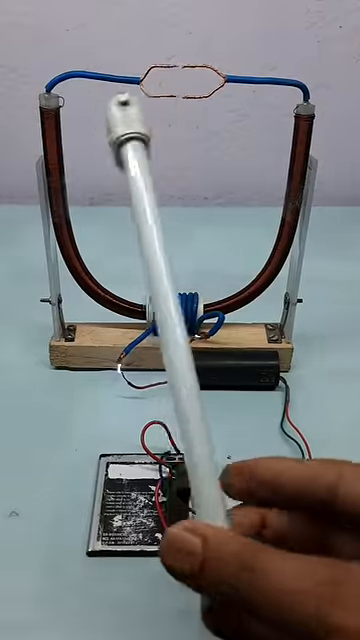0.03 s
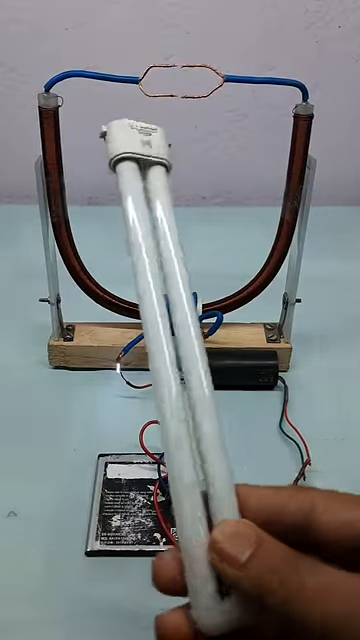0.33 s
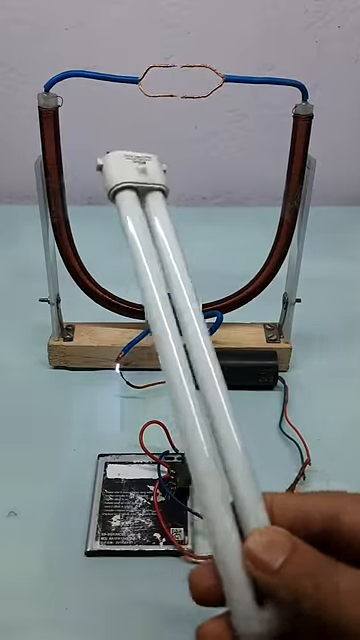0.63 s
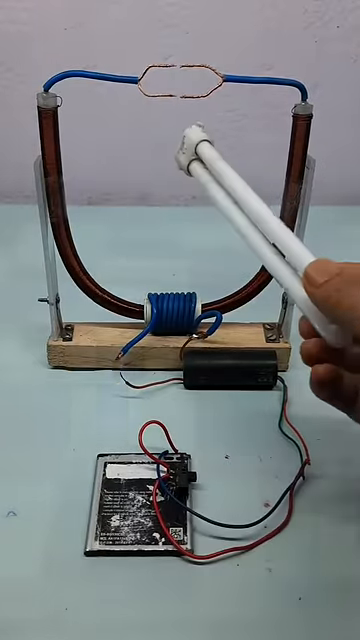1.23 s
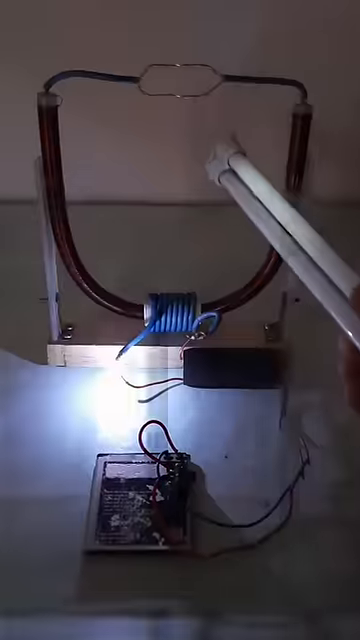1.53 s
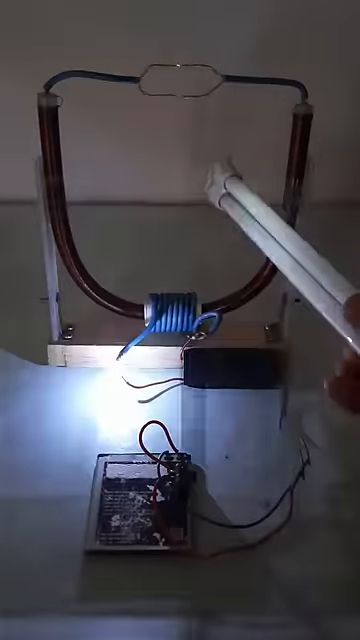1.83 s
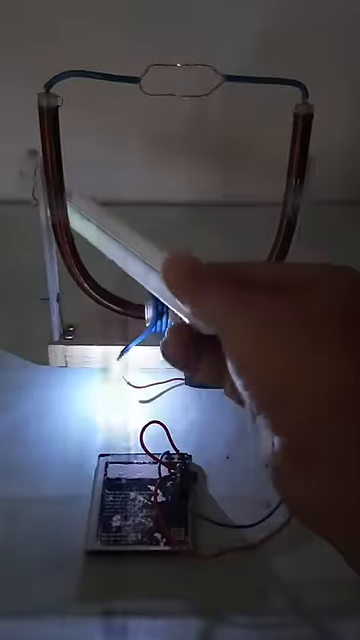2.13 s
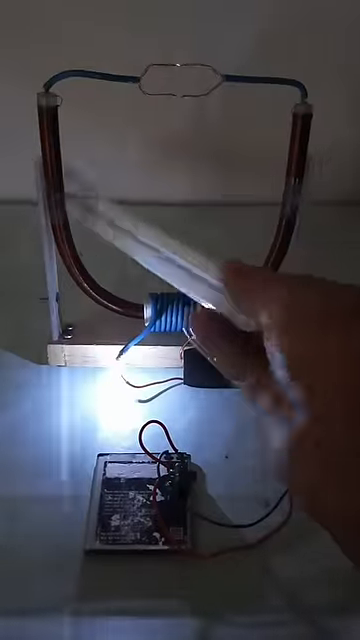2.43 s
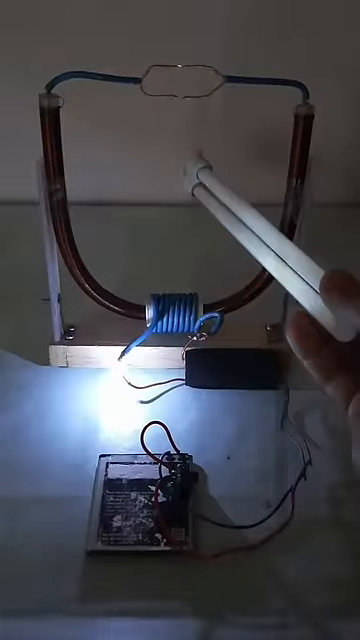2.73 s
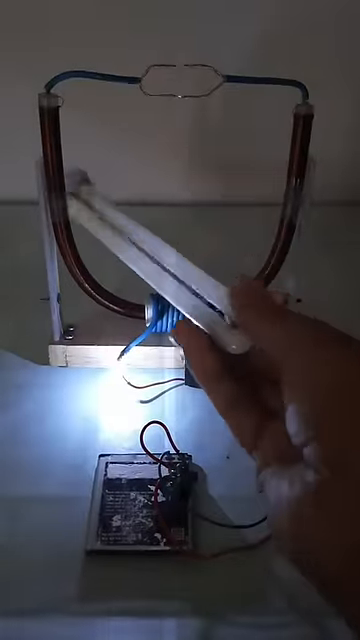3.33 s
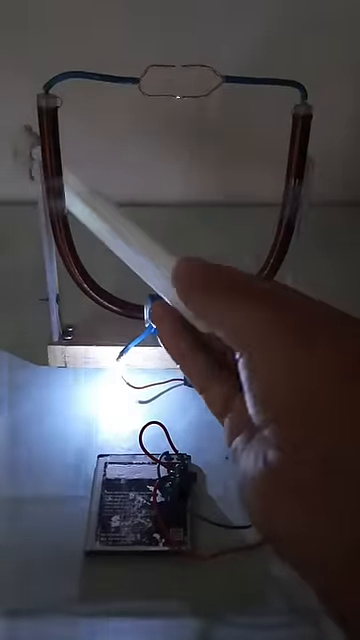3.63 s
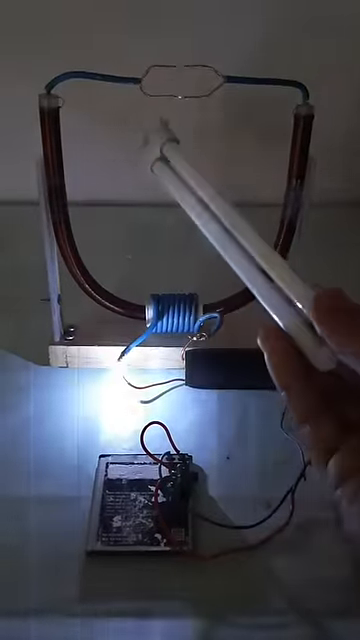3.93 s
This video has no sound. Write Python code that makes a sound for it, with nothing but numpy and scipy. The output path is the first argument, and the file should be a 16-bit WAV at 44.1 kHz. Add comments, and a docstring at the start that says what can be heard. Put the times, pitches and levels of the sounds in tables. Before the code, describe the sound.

An electric arc crackles and buzzes continuously on a tabletop coil device in a small room. The close, raspy sound wavers slightly in strength and tone, with small low pops under the sparks and a soft background hiss.

```python
"""On a table in a small room, a high-voltage module driving a homemade coil fires across a spark gap
about two hundred times a second. The air breaks down after a short or a long charge, so the buzz
sputters or settles on a pitch. Each spark is a sharp snap from a crooked channel, with a low pop of
heated air. The wandering arc changes strength and colour; the table reflects each snap, and
reverberation fills the gaps over a steady background hiss."""
import sys
import numpy as np
from scipy import signal
from scipy.fft import rfft, irfft
from scipy.io import wavfile
from scipy.ndimage import uniform_filter1d

SR = 44100
rng = np.random.default_rng(int(sys.argv[2]) if len(sys.argv) > 2 else 0)


def unload_wav(signal):
    """Save mono or channel-first audio to the path in sys.argv[1] as 16-bit WAV at rate SR, clipped to [-1, 1]."""
    wavfile.write(
        sys.argv[1],
        SR,
        np.round(np.clip(np.atleast_2d(signal).T, -1, 1) * 32767).astype(np.int16),
    )


N = 176400
TIME = np.arange(N) / SR
BIN_HZ = np.maximum(np.arange(N // 2 + 1) * SR / N, 1)
POP_HZ, RASP_HZ, CRACK_HZ, FIZZ_HZ = (13, 1366), (1366, 2890), (2860, 7060), (7060, SR / 2)  # band edges

# Spectrum of a spark. Each row: frequency in Hz, relative level in dB.
SPARK_SPECTRUM = [(40, -23), (85, -20), (140, -5), (280, 3.5), (430, 2), (720, 6.5), (950, 2.5), (1500, 1),
                  (2250, 2.5), (3000, 3), (3900, -2.5), (4800, 3.5), (5900, -2), (6900, -3.5), (9000, -6),
                  (12500, -3), (16000, -7)]


def undb(db):
    """Amplitude ratio: a factor of ten for every 20 dB."""
    return 10 ** (np.asarray(db) / 20)


def unit(x):
    """Normalisation to rms 1."""
    return x / np.sqrt(np.mean(x ** 2))


def even(x, window_s=.016):
    """Division by the running rms holds the power steady over a few sparks."""
    size = int(window_s * SR)
    power = uniform_filter1d(uniform_filter1d(np.mean(x ** 2, axis=0), size), size)
    return x / np.sqrt(power + 1e-4 * power.mean())


def curve(rows):
    """Amplitude envelope, interpolated between rows of time in seconds and level in dB."""
    return undb(np.interp(TIME, *np.array(rows).T))


def wander(per_s):
    """Interpolated Gaussian noise: a slow fluctuation with a spread near 1."""
    return 1.2 * np.interp(TIME * per_s, np.arange(2000), rng.standard_normal(2000))


def colour(x, points):
    """Minimum-phase filter through points of frequency in Hz and gain in dB."""
    hz, db = np.array(points).T
    gain = undb(np.interp(np.log(BIN_HZ), np.log(hz), db))
    cepstrum = irfft(np.log(gain), N)
    cepstrum[1:N // 2] *= 2  # folding onto positive time makes the filter causal
    cepstrum[N // 2 + 1:] = 0
    return irfft(rfft(x) * np.exp(rfft(cepstrum)), N)


def band(x, lo_hz, hi_hz):
    """Zero-phase band-pass filter with soft edges."""
    return irfft(rfft(x) / np.sqrt((1 + (lo_hz / BIN_HZ) ** 10) * (1 + (BIN_HZ / hi_hz) ** 10)), N)


def delay(x, seconds):
    """A delay is a phase lag proportional to frequency."""
    return irfft(rfft(x) * np.exp(-2j * np.pi * BIN_HZ * seconds), N)


def resonate(x, hz, width_hz):
    """Second-order resonator, whose Q is its frequency over its bandwidth."""
    return signal.lfilter(*signal.iirpeak(hz, hz / width_hz, fs=SR), x)


def multipath(x, envelope, changes_per_s, count):
    """Multipath propagation: x crossfades among random echo patterns, unrelated left and right."""
    shares = np.array([wander(changes_per_s) for _ in range(count)])
    shares /= np.sqrt(np.sum(shares ** 2, axis=0))
    patterns = rng.standard_normal((count, 2, len(envelope))) * envelope / np.sqrt(np.sum(envelope ** 2))
    return sum(signal.fftconvolve(np.atleast_2d(x * share), pattern, axes=1)[:, :N]
               for share, pattern in zip(shares, patterns))


def breakdowns(count=1100, repeat_chance=.25):
    """Relaxation oscillation: the gap fires after each short or long charge. Gives sample positions."""
    # Each row: time in seconds, chance of a long charge (at 1 the buzz has a pitch, near .5 it sputters).
    long_chances = [(0, .95), (.17, .95), (.2, .4), (.37, .4), (.4, 1), (.51, 1), (.55, .6), (.8, .7),
                    (.85, .45), (1.8, .6), (1.88, .2), (2.0, .55), (2.7, .5), (2.8, .2), (2.87, .8),
                    (3.14, .7), (3.19, .2), (3.25, 1), (3.46, 1), (3.5, .65)]
    short_s, short_jitter_s, long_s, long_jitter_s = .00405, .00012, .00545, .00032
    when, chance = np.array(long_chances).T
    drifts = 1 + .04 * wander(per_s=25)[::N // count][:count]
    now, is_long, positions = 0., True, []
    for (change, pick), jitter, drift in zip(rng.random((count, 2)), rng.standard_normal(count), drifts):
        if change > repeat_chance:
            is_long = pick < np.interp(now, when, chance)
        now += long_s * drift + long_jitter_s * jitter if is_long else short_s + short_jitter_s * jitter
        positions.append(int(now * SR))
    return np.array([i for i in positions if i < N])


def snaps(at, scatter_db):
    """Impulsive excitation: one impulse of log-normal size for each spark."""
    return np.bincount(at, minlength=N) * undb(scatter_db * rng.standard_normal(N))


def straight_channel(snap):
    """Path difference: the arc's straight part sends a clean snap that reaches one side later."""
    # Each row: time in seconds, lag on the left in seconds, level against the crooked part in dB.
    arc_places = [(0, .00029, -5), (.87, .00029, -5), (.93, 0, -9), (1.05, .0003, -11), (1.2, .00005, -9),
                  (1.5, .00032, -7), (2.28, .0003, -11), (2.34, .00003, -7), (2.55, .00003, -7),
                  (2.62, .00032, -11), (3.18, .0003, -11), (3.25, -.00007, -9), (3.46, -.00005, -7),
                  (3.5, 0, 1), (3.86, 0, 0), (3.9, 0, -11)]
    when, lag_s, db = np.array(arc_places).T
    at = np.flatnonzero(snap)
    lag = np.round(np.interp(at / SR, when, lag_s) * SR).astype(int)
    left = np.bincount(np.clip(at + lag, 0, N - 1), snap[at], N)
    return unit(np.array([left, snap])) * curve(np.c_[when, db])


def crooked_channel(snap, spread_s=.00036, fork_db=-.5, reach=64):
    """Unequal travel times smear each snap: the main path lasts several sparks, its forks about one."""
    spread = np.exp(-np.abs(np.arange(-reach, reach + 1) / SR) / spread_s)
    early = np.roll(snap, -reach)  # centres the smear on the spark
    main_path = multipath(early, spread, changes_per_s=35, count=8)
    forks = multipath(early, spread, changes_per_s=190, count=8)
    return unit(main_path + undb(fork_db) * forks)


def table_reflection(x, top_hz=6600):
    """Image source: each side hears the spark and its duller mirror image in the table."""
    # Left, then right. Each row: delay in seconds, gain in dB.
    echoes = [(.0005, -6), (.00051, -10)]
    return np.array([side + undb(db) * delay(band(side, 13, top_hz), lag_s)
                     for side, (lag_s, db) in zip(x, echoes)])


def pops(at, phase_gap_rad=1.58, sway_rad=.79, calming=.49):
    """Thermal expansion: each spark's heated air gives a low pop, whose phase sways as the arc moves."""
    # Each row: time in seconds, level in dB.
    pop_levels = [(0.0, -35), (0.04, -39), (0.08, -33), (0.14, -42), (0.16, -37), (0.19, -43), (0.2, -38),
                  (0.41, -35), (0.54, -40), (0.63, -42), (0.69, -35), (0.8, -42), (0.86, -34), (0.97, -36),
                  (0.99, -41), (1.01, -36), (1.25, -37), (1.31, -41), (1.36, -34), (1.39, -38), (1.59, -33),
                  (1.61, -39), (1.7, -35), (1.89, -42), (1.95, -37), (2.27, -40), (2.28, -48), (2.32, -36),
                  (2.35, -34), (2.38, -43), (2.53, -36), (2.64, -40), (2.65, -46), (2.69, -39), (2.72, -43),
                  (2.75, -36), (2.78, -41), (2.88, -35), (2.95, -39), (3.05, -38), (3.11, -42), (3.2, -37),
                  (3.36, -35), (3.7, -41), (3.77, -44), (3.82, -37), (3.84, -42), (3.87, -32), (3.93, -36),
                  (4.0, -33)]
    # Short runs of heavier pops. Each row: centre in seconds, length in seconds, peak level in dB.
    sputters = [(1.069, 0.027, -30.5), (1.12, 0.016, -31), (1.175, 0.015, -32), (1.278, 0.019, -31.5),
                (1.451, 0.034, -30), (2.115, 0.011, -34.5), (2.181, 0.037, -30), (3.065, 0.016, -30.5)]
    sputter = sum(undb(db) * np.exp(-2 * ((TIME - centre) / length) ** 2)
                  for centre, length, db in sputters)
    strength = np.hypot(curve(pop_levels), sputter)
    flare = flaring()
    # The arc is steadier in flares and sputters, so scatter and sway shrink.
    unrest = 1 - calming * np.maximum(flare / flare.max(), sputter / strength)
    push = snaps(at, scatter_db=6 * unrest)
    pop = band(colour(push - push.mean(), SPARK_SPECTRUM), *POP_HZ)
    offset = phase_gap_rad * np.sqrt(unrest) / 2
    phase = np.array([sway_rad * unrest * wander(per_s=80) + side * offset for side in (-1, 1)])
    return strength * even(np.real(signal.hilbert(pop) * np.exp(1j * phase)))


def rasp(arc, clean, gain_db=-4.5):
    """Resonance: in a flare the clean snaps drive one nasal ring, which takes over the arc's midrange."""
    # Each row: time in seconds, relative level in dB.
    rasp_levels = [(0.0, -34), (0.19, -34), (0.36, -31), (0.39, -34), (0.56, -36), (0.6, -33), (0.64, -35),
                   (0.75, -30), (0.79, -37), (0.95, -29), (0.96, -33), (1.07, -34), (1.22, -30),
                   (1.26, -38), (1.29, -35), (1.31, -40), (1.36, -28), (1.39, -35), (1.51, -32),
                   (1.53, -28), (1.6, -31), (1.62, -38), (1.63, -32), (1.78, -31), (1.8, -36), (1.88, -31),
                   (1.89, -33), (1.95, -30), (2.06, -36), (2.09, -31), (2.14, -35), (2.19, -29),
                   (2.21, -34), (2.32, -35), (2.35, -31), (2.39, -34), (2.44, -31), (2.48, -33),
                   (2.51, -29), (2.56, -36), (2.59, -30), (2.63, -38), (2.67, -33), (2.74, -37),
                   (2.89, -30), (2.96, -33), (3.06, -33), (3.09, -36), (3.22, -34), (3.32, -29), (3.4, -32),
                   (3.47, -31), (3.49, -34), (3.6, -32), (3.67, -36), (3.69, -33), (3.73, -39), (3.76, -34),
                   (3.77, -39), (3.8, -32), (3.9, -31), (3.94, -34), (3.95, -31), (4.0, -32)]
    plain = even(band(arc, *RASP_HZ))
    ring = even(resonate(band(clean, *RASP_HZ), hz=2220, width_hz=650))
    share = flaring()
    return undb(gain_db) * curve(rasp_levels) * even(share * ring + (1 - share) * plain)


def crack(arc, clean, gain_db=-4):
    """Resonance: at times the arc's treble narrows to a hollow sizzle, driven by the clean snaps."""
    # Each row: time in seconds, relative level in dB.
    crack_levels = [(0.0, -28), (0.05, -31), (0.27, -28), (0.28, -31), (0.35, -28), (0.38, -30),
                    (0.71, -29), (0.78, -29), (0.85, -28), (0.87, -31), (0.91, -28), (1.04, -34),
                    (1.06, -30), (1.21, -30), (1.24, -34), (1.37, -30), (1.38, -33), (1.44, -33),
                    (1.45, -28), (1.49, -30), (1.7, -28), (1.92, -32), (2.1, -31), (2.13, -33), (2.16, -28),
                    (2.21, -32), (2.35, -30), (2.39, -32), (2.44, -30), (2.57, -31), (2.6, -27),
                    (2.63, -35), (2.68, -28), (2.78, -33), (2.89, -29), (3.04, -33), (3.07, -30),
                    (3.09, -37), (3.18, -30), (3.25, -29), (3.3, -32), (3.36, -29), (3.49, -31),
                    (3.56, -26), (3.58, -29), (3.78, -31), (3.81, -29), (4.0, -31)]
    # Each row: frequency in Hz, bandwidth in Hz, relative level in dB.
    resonances = [(3850, 700, 0), (5800, 1000, -4)]
    # Each row: time in seconds, level against the plain crack in dB.
    sizzle_levels = [(0, 0), (.25, 4), (.5, -7), (.8, 4), (1.1, -13), (1.7, -6), (2.2, -15), (2.9, -11),
                     (3.35, -15), (3.55, -1), (3.8, -6), (4, -15)]
    plain = even(band(arc, *CRACK_HZ))
    drive = band(clean, *CRACK_HZ)
    sizzle = even(sum(undb(db) * resonate(drive, hz, width) for hz, width, db in resonances))
    return undb(gain_db) * curve(crack_levels) * even(plain + curve(sizzle_levels) * sizzle)


def fizz(arc):
    """A brief pulse has a broad spectrum: the snaps reach into the top treble."""
    # Each row: time in seconds, relative level in dB.
    fizz_levels = [(0.0, -29), (0.04, -35), (0.08, -30), (0.17, -33), (0.26, -28), (0.29, -33), (0.35, -29),
                   (0.54, -32), (0.55, -29), (0.67, -32), (0.72, -29), (0.77, -34), (0.84, -31),
                   (1.39, -34), (1.46, -32), (1.57, -34), (1.59, -30), (1.92, -33), (2.31, -33),
                   (2.54, -31), (2.58, -34), (2.6, -30), (2.63, -35), (2.69, -30), (2.74, -35), (2.87, -30),
                   (3.07, -35), (3.1, -38), (3.25, -31), (3.4, -34), (3.42, -31), (3.74, -33), (3.82, -31),
                   (4.0, -32)]
    return curve(fizz_levels) * even(band(arc, *FIZZ_HZ))


def flaring(edge_s=.0099):
    """Trapezoidal envelope of the flares: the ring's share of the rasp over time."""
    # Each row: start in seconds, end in seconds, peak share from 0 to 1.
    flares = [(.9, .96, .55), (1.18, 1.23, .55), (2.33, 2.55, .7), (3.24, 3.52, .6), (3.79, 3.89, .7)]
    return sum(peak * np.clip(np.minimum(TIME - start, end - TIME) / edge_s, 0, 1)
               for start, end, peak in flares)


def spark_gap(flicker_db=1.41):
    """Amplitude modulation: rasp, crack and fizz flicker together as the arc wanders, over the pops."""
    at = breakdowns()
    snap = snaps(at, scatter_db=1.87)
    clean = colour(table_reflection(straight_channel(snap)), SPARK_SPECTRUM)
    arc = clean + colour(table_reflection(crooked_channel(snap)), SPARK_SPECTRUM)
    low = pops(at)
    bright = rasp(arc, clean) + crack(arc, clean) + fizz(arc)
    return low + bright * undb(flicker_db * wander(per_s=60))


def room(x, t60_s=.14, onset_s=.0011, gain_db=-2.5):
    """Reverberation: a diffuse tail decays exponentially, its pattern shifting with the moving arc."""
    # Each row: frequency in Hz, relative gain in dB.
    room_response = [(100, 14), (300, -4.5), (700, -7.5), (1200, -13.5), (2400, 0.5), (4000, -1.5),
                     (7000, -6), (12000, -5), (16000, -8)]
    t = TIME[:N // 12]
    decay = np.exp(-np.log(1000) * t / t60_s) * (t > onset_s)
    return undb(gain_db) * colour(multipath(x, decay, changes_per_s=40, count=5), room_response)


def hiss(level_db=-37):
    """Filtered noise: a steady background hiss, uncorrelated left and right."""
    # Each row: frequency in Hz, relative level in dB.
    spectrum = [(15, -4), (40, 5), (100, -10), (300, -13), (2000, 8)]
    return undb(level_db) * unit(colour(rng.standard_normal((2, N)), spectrum))


def scene():
    """Superposition of the spark gap, its reverberation and the background hiss."""
    gap = spark_gap()
    return gap + room(gap) + hiss()


def record(dry, rounding=.45, top_hz=15780):
    """Soft saturation rounds the sharpest peaks; a steep low-pass filter cuts the top."""
    soft = np.tanh(rounding * dry) / rounding
    low_pass = signal.firwin(301, top_hz, fs=SR, window="blackman")
    return signal.fftconvolve(soft, low_pass[None], mode="same", axes=1)


dry = scene()
out = record(dry)
unload_wav(out)
```